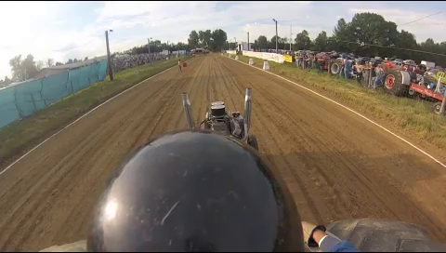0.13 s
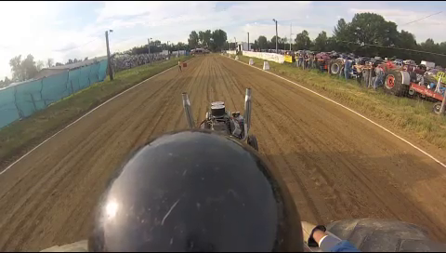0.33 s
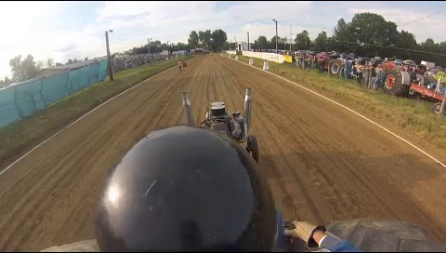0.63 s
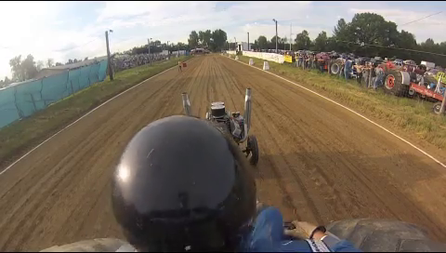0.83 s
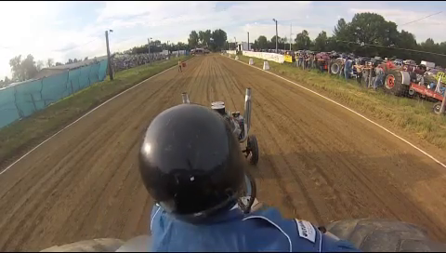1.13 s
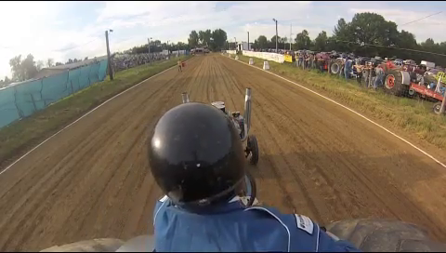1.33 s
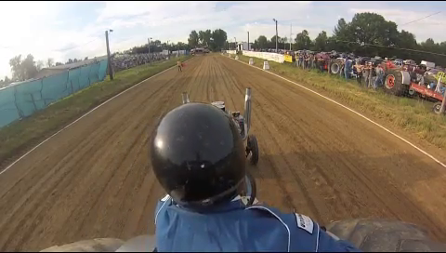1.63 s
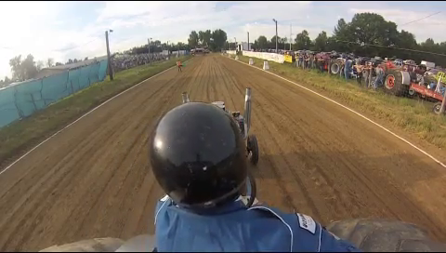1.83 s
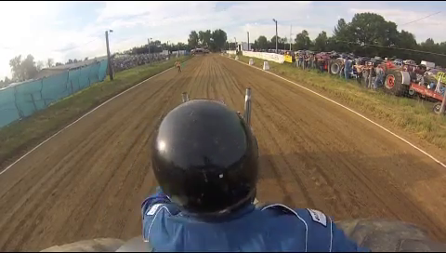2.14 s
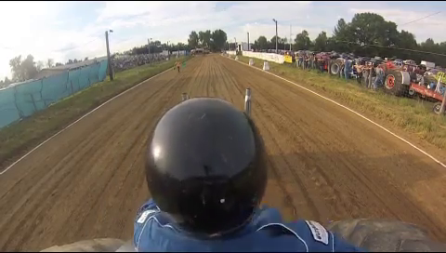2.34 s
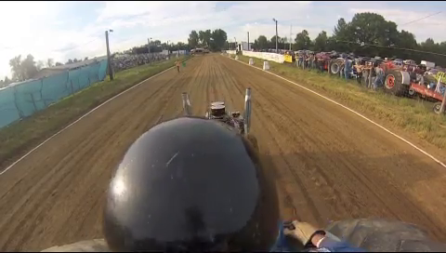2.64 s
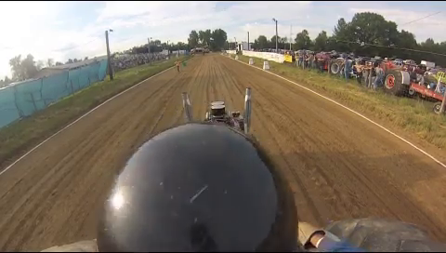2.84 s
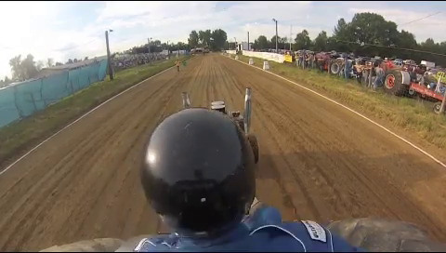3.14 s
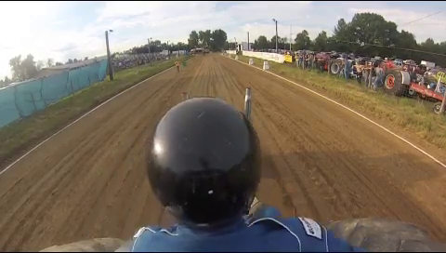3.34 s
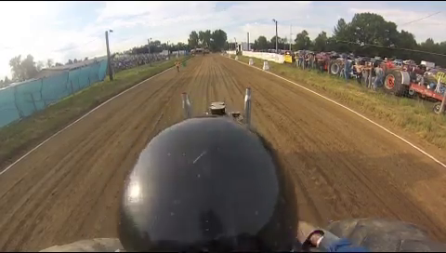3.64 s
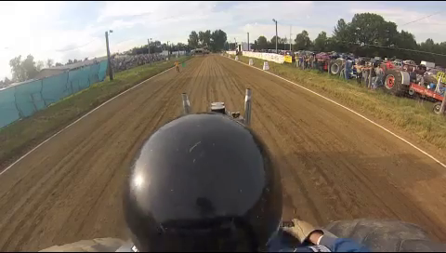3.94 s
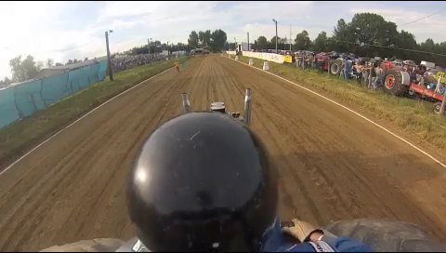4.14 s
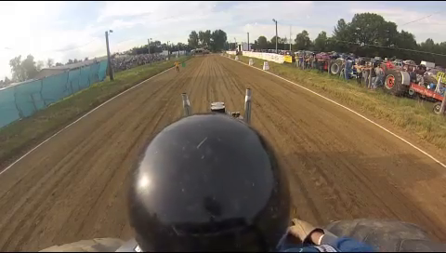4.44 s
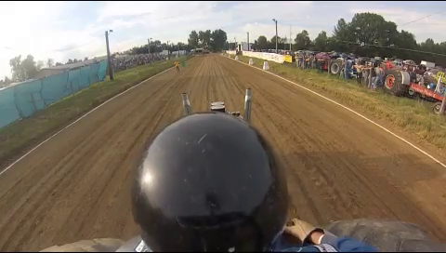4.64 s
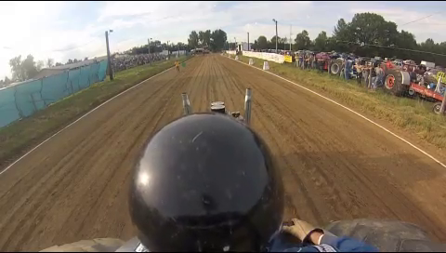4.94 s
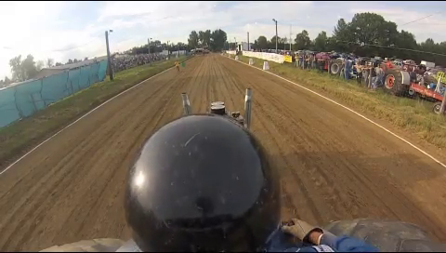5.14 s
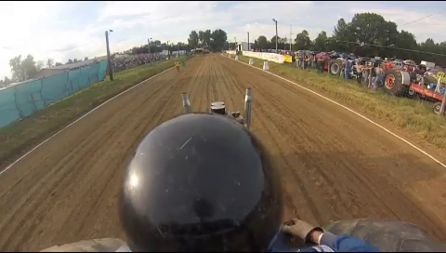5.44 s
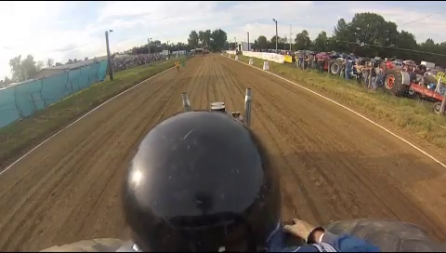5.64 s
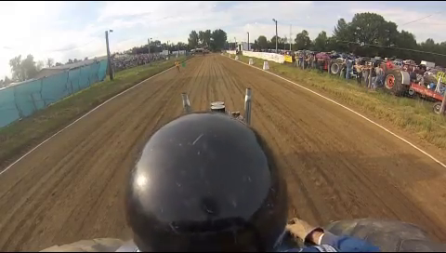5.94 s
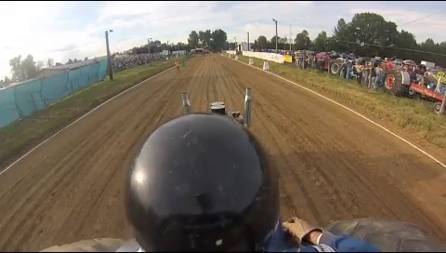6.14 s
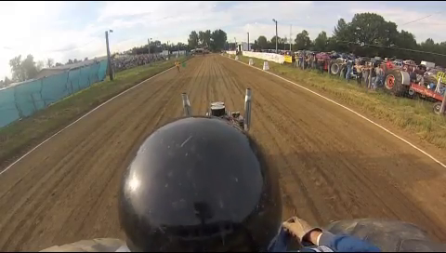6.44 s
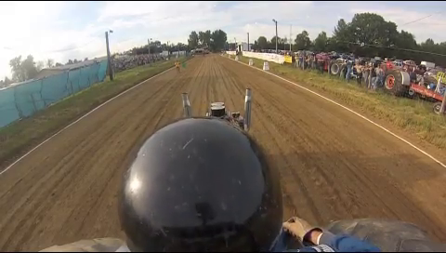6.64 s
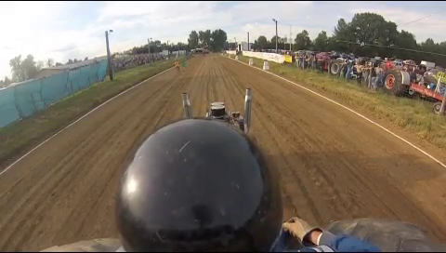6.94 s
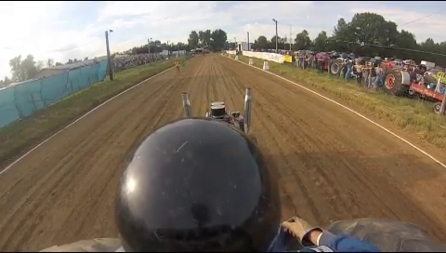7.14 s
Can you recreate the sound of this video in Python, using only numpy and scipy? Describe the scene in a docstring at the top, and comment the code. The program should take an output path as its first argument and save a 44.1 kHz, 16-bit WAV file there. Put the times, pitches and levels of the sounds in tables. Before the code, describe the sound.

A pulling tractor's eight-cylinder engine idles with a throbbing hum and rattling ticks, then climbs in speed and opens into a loud roar.

```python
"""Behind the driver of a pulling tractor, in a closed camera case: an eight-cylinder engine idles,
creeps up in speed, then opens up under load. Sines locked to the engine cycle make hum, drone and swells;
pulsed noise through the ringing case makes the roar. The crank shakes the mount as a low rumble.
Loose parts rattle as noise knocks in step with the firings, and single ticks crack over them."""
import sys
import numpy as np
from scipy import signal
from scipy.fft import rfft, irfft
from scipy.io import wavfile
from scipy.ndimage import uniform_filter1d, map_coordinates

SR = 44100
rng = np.random.default_rng(int(sys.argv[2]) if len(sys.argv) > 2 else 0)


def unload_audio(sound):
    """Save the sound as a 16-bit wav file, at the path given as the first command line argument."""
    columns = np.transpose(np.atleast_2d(sound))
    # keep every value between -1 and 1, then stretch to whole-number steps
    steps = np.round(np.clip(columns, -1, 1) * 32767)
    wavfile.write(sys.argv[1], SR, steps.astype(np.int16))


N = 321048  # length in samples


def undb(db):
    """Decibels to gain."""
    return 10 ** (np.asarray(db) / 20)


def curves(table):
    """The columns of a table after t/s, joined by straight lines in time."""
    s, *columns = np.transpose(table)
    return [np.interp(np.arange(N) / SR, s, c) for c in columns]


def unit(x):
    """Scale to rms 1."""
    return x / np.sqrt(np.mean(x ** 2))


def steady(x, span_s):
    """Ride the level to a running rms near 1, averaging the power twice over the span."""
    size = max(int(span_s * SR), 2)
    power = uniform_filter1d(uniform_filter1d(x ** 2, size), size)
    return x / np.sqrt(power + 1e-18)


def walk(rate):
    """Smooth random drift of rms 1, with a new random point rate times a second."""
    knots = rng.standard_normal(2048)
    return unit(map_coordinates(knots, [np.arange(N) / SR * rate], order=3, mode="wrap"))


def band(x, lo_hz, hi_hz, order=4):
    """Band-pass."""
    return signal.sosfilt(signal.butter(order, [lo_hz, min(hi_hz, SR / 2 - 1)], "band", fs=SR, output="sos"), x)


def ring(x, hz, width_hz):
    """One resonance, gain 1 at its centre."""
    return signal.lfilter(*signal.iirpeak(hz, hz / width_hz, fs=SR), x)


# sound through the dull case wall: f/Hz, level/dB
WALL = [(200, -2), (350, -12), (580, -15.5), (850, -15), (1250, -15), (1650, -17), (2000, -16), (2500, -5),
        (3000, -14), (5000, -27), (7000, -27.5), (10000, -38.5), (13500, -36.5), (15000, -41)]
# ringing resonances of the case, lowest first: f/Hz, width f/Hz, lift over the wall level/dB
CASE = [(286.6, 19, 21), (461, 56, 12.5), (728, 69, 11.5), (953, 107, 8), (1099.4, 14.2, 15),
        (1349, 181, 13), (1505, 18, 13), (1851, 220, 11), (2093, 11, 16), (2223, 121, 16.5),
        (2384, 41.5, 10.5), (2738, 54, 14.5), (3952, 110, 8), (5540, 430, 8.5), (7940, 760, 8),
        (9163, 200, 8.5), (10990, 2400, 14), (14700, 950, 16.5)]


def case(x, size=16384):
    """Minimum-phase response of the camera case: a dull wall with ringing resonances."""
    hz = np.maximum(np.arange(size // 2 + 1) * SR / size, 1)
    wall_hz, wall_db = np.transpose(WALL)
    db = np.interp(np.log(hz), np.log(wall_hz), wall_db)
    db = db + sum(lift / (1 + (2 * (hz - f) / width) ** 2) for f, width, lift in CASE)
    # folding the cepstrum forward makes every resonance ring after its blow, never before
    cepstrum = irfft(np.log(undb(db)))
    cepstrum[1:size // 2] *= 2
    cepstrum[size // 2 + 1:] = 0
    response = irfft(np.exp(rfft(cepstrum)))
    return signal.fftconvolve(x, response)[:N]


# strength of each cylinder in firing order, before a layer softens it: level/dB
CYLINDERS = [1.5, 0, -3.5, 0, -2, -2, -3, -4]


def per_firing(cycle, scatter_db, count=2048):
    """Gain of the current firing: its cylinder's strength and some chance."""
    firing = (len(CYLINDERS) * cycle).astype(int)
    chance_db = scatter_db * rng.standard_normal(count)[firing]
    return undb(np.array(CYLINDERS)[firing % len(CYLINDERS)] + chance_db)


def puffs(cycle, length):
    """An envelope that jumps at each firing and decays; length is its time constant in firing gaps."""
    return np.exp(-(cycle * len(CYLINDERS) % 1) / length)


def line(cycle, multiple, waver):
    """A sine locked to a multiple of the engine cycle, wavering in size and phase."""
    angle = 2 * np.pi * (multiple * cycle + rng.random())
    in_step = (1 + waver * walk(12)) * np.sin(angle)
    aside = waver * walk(10) * np.cos(angle)
    return np.sqrt(2) * (in_step + aside)


IDLE_HZ, FULL_HZ = 117.2, 264.3  # firing rates that count as throttle closed and wide open


def load(fire_hz):
    """Throttle from 0 to 1, taken from the firing rate because the engine speeds up as it opens."""
    return np.clip((fire_hz - IDLE_HZ) / (FULL_HZ - IDLE_HZ), 0, 1)


def grows(throttle, idle_db, rise_db, bend):
    """Gain of a layer that gets louder as the throttle opens; a bend above 1 makes the rise come late."""
    return undb(idle_db + rise_db * throttle ** bend)


# idle hum at the firing rate: t/s, level/dB
TONE = [(0.0, -22), (0.49, -22.5), (1.37, -24.5), (1.41, -23), (1.56, -28), (1.64, -23), (1.71, -25.5),
        (2.54, -21), (2.59, -31), (2.64, -28), (2.81, -24.5), (2.86, -29.5), (2.93, -19), (3.06, -25.5),
        (4.2, -24), (4.37, -16), (4.43, -18), (4.52, -35.5)]
TONE_WAVER_DB, TONE_WAVER_HZ = 0.63, 7.6  # rms of the random swell, random points a second
# above this firing rate the hum has left the case's low resonance; the fade spreads a few Hz around it
TONE_ENDS_HZ, TONE_FADE_HZ = 140.7, 1.4


def hum(cycle, fire_hz):
    """The clean firing tone, which dies away once the engine leaves idle."""
    fade = .5 - .5 * np.tanh((fire_hz - TONE_ENDS_HZ) / TONE_FADE_HZ)
    level_db = curves(TONE)[0] + TONE_WAVER_DB * walk(TONE_WAVER_HZ)
    return line(cycle, len(CYLINDERS), waver=0.15) * undb(level_db) * fade


# firing rate and its octave, clean as the load grows: idle level/dB, rise to full throttle level/dB, bend
FIRING = (-52, 14.7, 0.65)
OCTAVE = (-67.5, 25.6, 4.1)
# boom in the low resonances: idle level/dB, rise to full throttle level/dB, bend
BOOM = (-38.5, 18.2, 0.69)
# low lines that unequal cylinders leave: multiple of the engine cycle, relative level/dB
ORDERS = [(3, -6), (4, 1.5), (5, 0), (6, -4), (7, -4.5), (9, -9.5), (10, -28), (11, -9), (12, -4), (14, 0)]
# low resonances of the case: f/Hz, width f/Hz, relative level/dB
CAVITY = [(84, 5.5, -22), (123.2, 8.7, 19.5), (163, 28, -3)]
BOOM_EVEN_S = 1  # averaging span; shorter swells stay as a beat crosses a resonance


def drone(cycle, throttle):
    """Firing line and octave grow with load; slower beats of unequal cylinders boom in the case."""
    tone = line(cycle, len(CYLINDERS), waver=0.28) * grows(throttle, *FIRING)
    octave = line(cycle, 2 * len(CYLINDERS), waver=0.26) * grows(throttle, *OCTAVE)
    uneven = sum(undb(db) * line(cycle, k, waver=.22) for k, db in ORDERS)
    uneven = uneven + undb(-1) * unit(band(rng.standard_normal(N), 80, 200))
    resonant = sum(undb(db) * ring(uneven, hz, width) for hz, width, db in CAVITY)
    boom = band(resonant, 76.6, 167.7, order=3)
    return tone + octave + steady(boom, BOOM_EVEN_S) * grows(throttle, *BOOM)


# exhaust lines that stand out under load: multiple of the engine cycle, relative level/dB
OVERTONES = [(10, -18), (14, -19), (15, -19), (16, -15), (21, -18), (24, -16), (26, -18), (32, -12),
             (34, -15), (43, -15), (46, -18)]
# turbulence against the repeating blasts at idle, and its fall to full throttle
TURBULENCE_DB, TURBULENCE_FALL_DB = -1.5, 6.5


def blasts(cycle, throttle):
    """Gas from the open stacks: a pattern repeating each engine cycle, turbulence and growing lines."""
    size = 1024  # pattern points per firing
    one_cycle = irfft(np.exp(2j * np.pi * rng.random(size // 2)), len(CYLINDERS) * size)
    pattern = np.interp(cycle % 1, np.arange(len(one_cycle)) / len(one_cycle), one_cycle)
    pattern = steady(band(unit(pattern), 118, 5400, order=2), .2)
    gas = unit(band(rng.standard_normal(N), 150, 3200, order=2))
    flow = steady(pattern + gas * undb(TURBULENCE_DB - TURBULENCE_FALL_DB * throttle), .5)
    # cylinder differences soften as the throttle opens
    strength = per_firing(cycle, scatter_db=1.2) ** (.75 - .3 * throttle)
    pulsed = unit(flow * (1.3 + puffs(cycle, .55)) * strength)
    lines = sum(undb(db) * line(cycle, k, waver=.4) for k, db in OVERTONES)
    # the long pipes even out the low notes; the upper ones keep the beat of the cylinders
    evened = unit(flow + 1.8 * pulsed)
    return evened + lines * undb(4.1 * throttle - 13.5), pulsed


# low growl, midrange bark and bright rasp: idle level/dB, rise to full throttle level/dB, bend
GROWL = (-45, 13.43, 0.74)
BARK = (-37.5, 11.7, 0.87)
RASP = (-54, 17.2, 1.1)


def roar(cycle, throttle):
    """The exhaust heard through the case: growl, bark, ringing wall and rasp."""
    low, high = (case(x) for x in blasts(cycle, throttle))
    growl = steady(band(low, 157, 511), 0.51) * grows(throttle, *GROWL)
    # at idle the wall's main resonance throbs with the engine cycle and the crank
    throb = .35 * np.cos(2 * np.pi * cycle) + .3 * np.cos(4 * np.pi * cycle + 1)
    throb = throb + .3 * np.cos(8 * np.pi * cycle)
    high = high + throb * 0.56 * (1 - throttle) ** 5 * ring(high, 2480, 320)
    # the open throttle fills in the middle below the ringing of the wall
    middle = band(low, 548, 1876, order=6) * undb(3.2 * throttle + 1.17)
    bark = middle + band(high, 1708, 2784, order=6)
    strength = per_firing(cycle, scatter_db=2.5) ** 0.34
    hiss = case(rng.standard_normal(N) * (9.2 + puffs(cycle, 1.0)) * strength)
    # many small, close resonances give the hiss a hollow grain
    age = np.arange(SR // 25) / SR
    grain = rng.standard_normal(len(age)) * np.exp(-age / .008) + 12 * (age == 0)
    hiss = signal.fftconvolve(hiss, grain)[:N]
    hiss = hiss + 0.61 * ring(hiss, 4620, 160)
    bright = band(hiss, 3163, 6670, order=5) + undb(-10) * band(hiss, 7340, 13700)
    rasp = steady(bright, 0.75) * grows(throttle, *RASP)
    return growl + steady(bark, 0.42) * grows(throttle, *BARK) + rasp


# shaking of the mount: t/s, level/dB
SHAKE = [(0.0, -50), (2.57, -40), (4.56, -37.5), (4.64, -48.5), (5.8, -48), (6.28, -50), (6.73, -36),
         (7.28, -47)]


def shake(cycle):
    """Crank turns and whole engine cycles rock the springy mount."""
    push = line(cycle, 2, waver=.2) + undb(-3) * line(cycle, 1, waver=.2)
    push = push + undb(-9) * unit(band(rng.standard_normal(N), 24, 38))
    rocking = band(ring(push, 28.6, 9.6), 8.7, 42, order=2)
    return steady(rocking, 0.36) * undb(curves(SHAKE)[0])


# bright buzz and hard ringing chatter: idle level/dB, rise to full throttle level/dB, bend
BUZZ = (-59, 17.06, 0.99)
CHATTER = (-71.5, 33.9, 1.0)
CLUSTER_DB, CLUSTER_HZ = 4.5, 29.9  # buzz clusters at idle: swing either way, random points a second
KNOCK_LENGTH, KNOCK_FLOOR = 0.56, 0.033  # time constant in firing gaps; steady gain under the knocks


def rattle(cycle, throttle):
    """Loose parts knock unevenly with the firings at idle; at speed more evenly, ringing hard."""
    scatter_db = 6 - 3 * throttle
    envelope = (puffs(cycle, KNOCK_LENGTH) + KNOCK_FLOOR) * per_firing(cycle, scatter_db)
    knocks = envelope * rng.standard_normal(N)
    clusters = undb(CLUSTER_DB * (1 - throttle) ** 4 * np.tanh(2 * walk(CLUSTER_HZ)))
    buzz = steady(band(case(knocks), 5670, 14300, order=3), 0.13) * clusters
    chatter = steady(ring(ring(knocks, 5600, 680), 6630, 2100), 0.36)
    return buzz * grows(throttle, *BUZZ) + chatter * grows(throttle, *CHATTER)


# loudest ticks of the loose parts: t/s, peak level/dB
TICKS = [(0.079, -39), (0.2478, -42), (0.4577, -35), (0.6355, -40), (1.1558, -42), (1.285, -38),
         (1.5085, -35), (1.5834, -34.5), (1.6691, -47), (1.7988, -32), (1.8318, -39), (2.0887, -39),
         (2.208, -39), (2.3615, -42), (2.4867, -34), (2.725, -46), (3.0894, -38), (3.1411, -41),
         (3.6125, -43), (3.699, -36), (4.169, -35), (4.2578, -42), (4.3465, -40), (4.426, -33.5),
         (4.5486, -37), (4.6153, -39), (5.1672, -35), (5.246, -34)]


def ticks(count=882):
    """The hardest knocks of loose parts: a sharp crack with its own bright pitch, then a short buzz."""
    age = np.arange(count) / SR
    shape = np.exp(-age / .0012) + .3 * np.exp(-age / .005)
    out = np.zeros(N + count)
    for s, db in TICKS:
        burst = rng.standard_normal(count) * shape
        burst = burst + 1.8 * ring(burst, rng.uniform(8500, 14500), 3000)
        tick = band(case(burst)[:count], 4900, 12000, order=4)
        start = int(s * SR)
        out[start:start + count] += undb(db) * tick / np.abs(tick).max()
    return out[:N]


# exhaust lines that sweep through the lowest resonances: multiple of the engine cycle, relative level/dB
SWEEPING = [(10, -7), (16, -3), (18, -3), (24, -11)]
SWELL_DB = -37.5  # gain of all the lines together


def swells(cycle, count=2):
    """Exhaust lines rise with the engine and flare up in the case's lowest resonances."""
    lines = sum(undb(db) * line(cycle, k, waver=0.32) for k, db in SWEEPING)
    flares = sum(ring(ring(lines, hz, width), hz, width) for hz, width, _ in CASE[:count])
    return flares * undb(SWELL_DB)


# engine speed: t/s, firing rate f/Hz
SPEED = [(0.0, 120.5), (0.2, 118.6), (1.2, 117.1), (2.0, 116.9), (2.2, 118), (2.7, 117), (4.0, 118.6),
         (4.2, 120.9), (4.4, 124.7), (4.7, 137.8), (5.2, 152.6), (5.8, 167.6), (6.28, 174.7), (6.4, 185.4),
         (6.6, 214.4), (6.9, 245.3), (7.28, 271.1)]


def scene():
    """Engine layers turn with the crank, one firing per cylinder each cycle; single ticks lie on top."""
    fire_hz, = curves(SPEED)
    cycle = np.cumsum(fire_hz) / SR / len(CYLINDERS)
    throttle = load(fire_hz)
    exhaust = hum(cycle, fire_hz) + drone(cycle, throttle) + roar(cycle, throttle) + swells(cycle)
    return (exhaust + shake(cycle) + rattle(cycle, throttle) + ticks())[None]


TOP_HZ = 15400


def record(dry):
    """The camera cuts the top with a steep low-pass."""
    return signal.sosfilt(signal.ellip(10, .2, 80, TOP_HZ, fs=SR, output="sos"), dry)


dry = scene()
out = record(dry)
unload_audio(out)
```